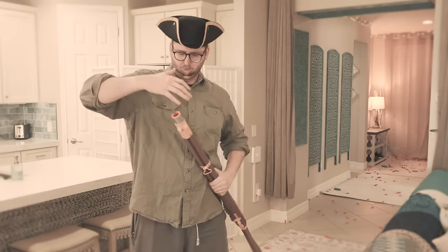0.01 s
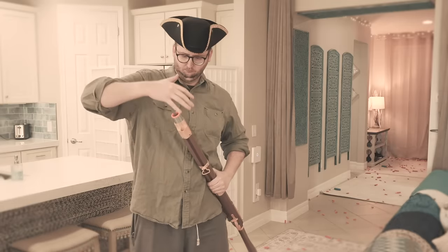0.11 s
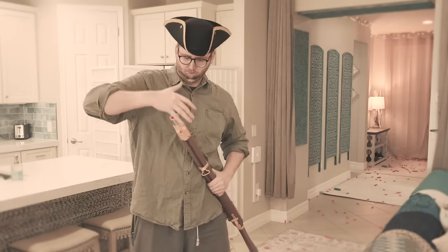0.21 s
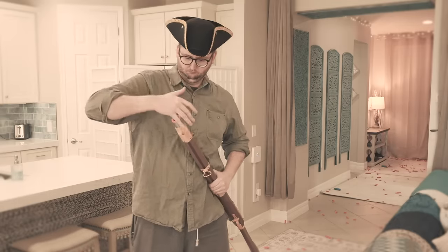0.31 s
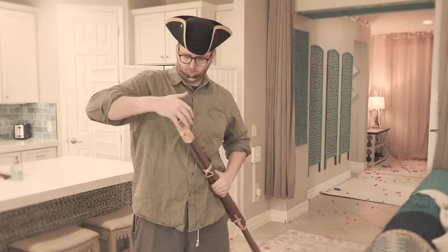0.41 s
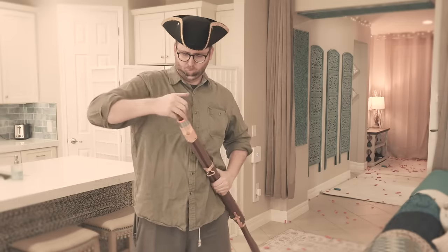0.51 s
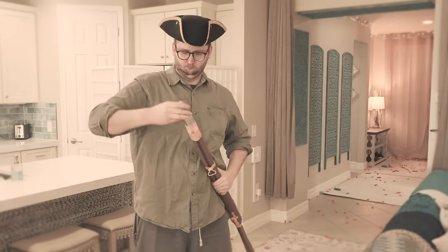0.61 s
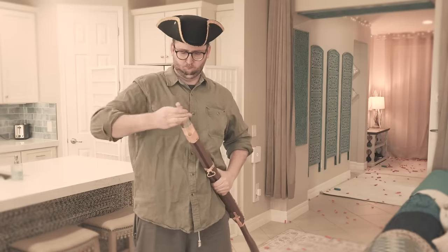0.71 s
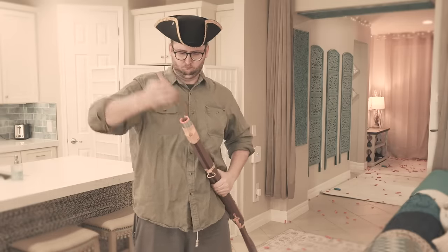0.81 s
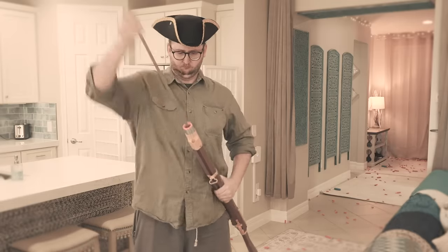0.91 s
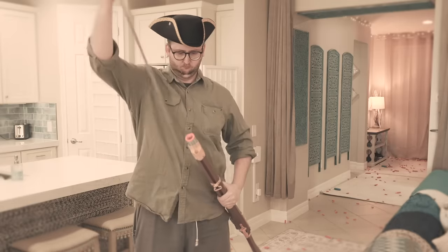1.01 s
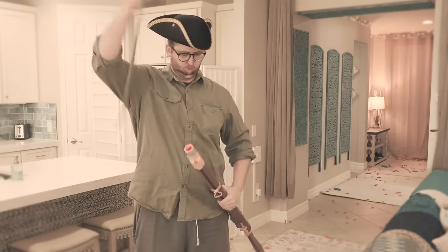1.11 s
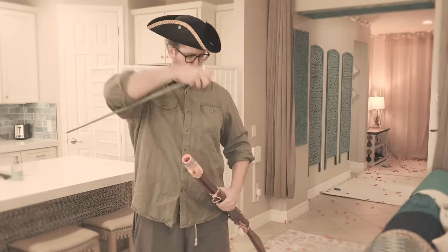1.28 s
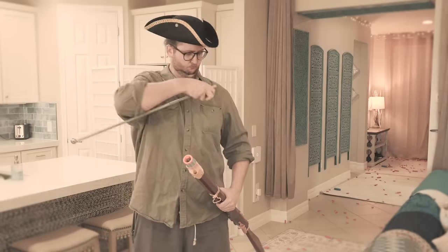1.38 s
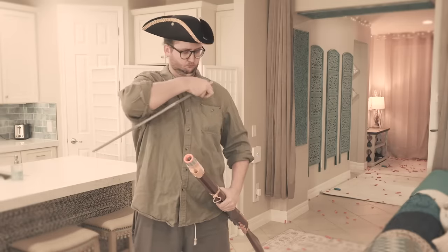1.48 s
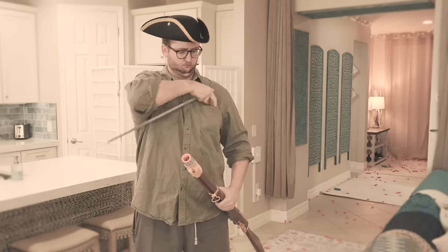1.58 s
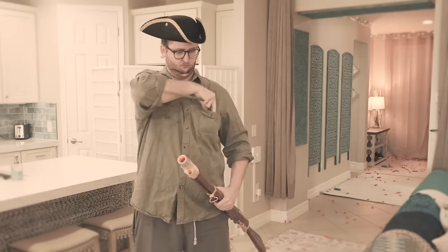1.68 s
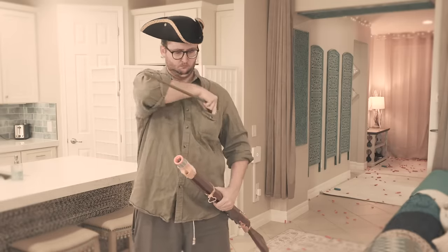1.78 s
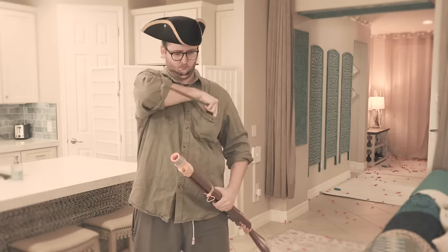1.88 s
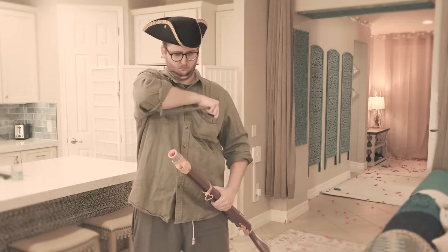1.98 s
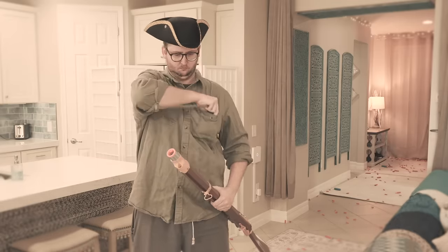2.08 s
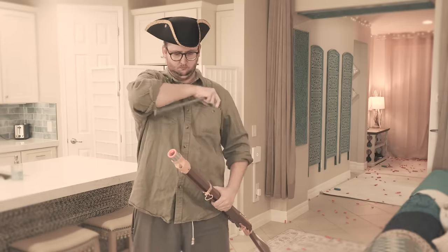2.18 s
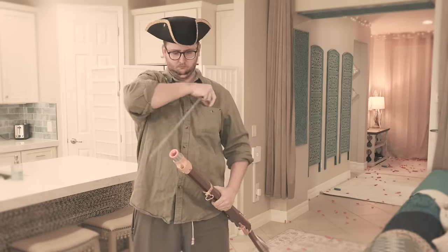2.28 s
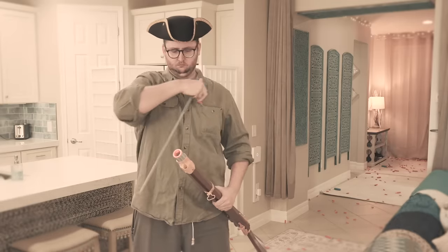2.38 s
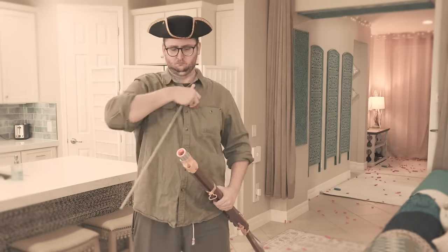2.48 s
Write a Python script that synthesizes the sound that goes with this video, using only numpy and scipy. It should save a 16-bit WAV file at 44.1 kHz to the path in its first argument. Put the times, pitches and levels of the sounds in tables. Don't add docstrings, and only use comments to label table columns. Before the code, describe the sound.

A thin ramrod is drawn from a hollow plastic toy barrel: light scrapes, a hard clack, small ticks, then a bright rattle at the muzzle, followed by faint sleeve rustle in a quiet kitchen, miked about two metres away.

```python
import sys
import numpy as np
from scipy import signal
from scipy.fft import rfft, irfft, next_fast_len
from scipy.io import wavfile
from scipy.ndimage import map_coordinates

SR = 44100
rng = np.random.default_rng(int(sys.argv[2]) if len(sys.argv) > 2 else 0)


def output_pcm(signal):
    pcm = np.clip(np.atleast_2d(signal).T, -1, 1) * 32767
    wavfile.write(sys.argv[1], SR, np.round(pcm).astype(np.int16))


def convert_level_to_amplitude(level_db):
    exponent = np.asarray(level_db, float) / 20
    return 10 ** exponent


N = 110250

LIFT_S, RATTLE_S = .985, .9772


def unit(x):
    return x / np.sqrt(np.mean(x ** 2) + 1e-20)


def along(points, hz):
    f, v = np.transpose(points)
    return np.interp(np.log(hz + 1), np.log(f + 1), v)


def curves(rows):
    s, *cols = np.transpose(rows)
    return [np.interp(np.arange(N) / SR, s, c) for c in cols]


def wobble(rate):
    knot = np.minimum(np.arange(N) * rate / SR, 990)
    return map_coordinates(rng.standard_normal(1000), [knot])


def filtered(x, response):
    m = next_fast_len(N + SR // 2)
    hz = np.fft.rfftfreq(m, 1 / SR)
    return irfft(rfft(x, m) * response(hz), m)[..., :N]


def ringing(x, peaks):
    def shape(f):
        total = 0
        for k, (centre, width, db) in enumerate(peaks):
            damping = 1j * f * width
            mode = damping / (centre * centre - f * f + damping)
            total = total + (-1) ** k * convert_level_to_amplitude(db) * mode
        return total

    norm = np.sqrt(np.mean(abs(shape(np.linspace(0, SR / 2, 4096))) ** 2))
    return filtered(x, shape) / norm


def coloured(spectrum):
    return unit(filtered(rng.standard_normal(N), lambda hz: convert_level_to_amplitude(along(spectrum, hz))))


def grit():
    slips_per_s, spread_db, smooth = 4000, 3, 1.2
    chance, size = rng.random(N), rng.standard_normal((2, N))
    strength = convert_level_to_amplitude(spread_db * np.clip(size[0], -2, 2)) * np.sign(size[1])
    slips = unit((chance < slips_per_s / SR) * strength)
    return unit(slips + smooth * rng.standard_normal(N))


# f/Hz, spectral level/dB
QUIET_SPECTRUM = [(12, -44.5), (20, -7.5), (118, -5), (176, -14), (501, -20.5), (604, -19.5), (1720, -28.5),
                  (3550, -31.5), (12200, -43.5), (15900, -86), (22000, -120)]
# f/Hz, level/dB, swing/dB
HUM_PARTIALS = [(60, 2, 1), (90, -7, 2.5), (120, 0, .8)]
# t/s, level of the lowest hum/dB
HUM_LOAD = [(0.0, -66.5), (0.29, -65), (0.7, -80), (1.04, -68.5), (1.62, -66.5), (2.08, -73.5), (2.5, -73)]


def house():
    t = np.arange(N) / SR
    load_db, = curves(HUM_LOAD)
    bases = [load_db, load_db.mean(), load_db.mean()]
    hum = 0
    for base, (hz, db, swing_db) in zip(bases, HUM_PARTIALS):
        level = convert_level_to_amplitude(base + db + swing_db * wobble(3.8))
        hum = hum + level * np.sin(2 * np.pi * hz * t + 1.8 * wobble(0.89))
    drone_mode = [(349.6, 48, 0)]  # f/Hz, width/Hz, level/dB
    drone_db, drone_s, rise_s = -79, 2.1, 0.065
    drone = unit(ringing(ringing(rng.standard_normal(N), drone_mode), drone_mode))
    drone = convert_level_to_amplitude(drone_db + 1.9 * wobble(14)) * drone / (1 + np.exp((drone_s - t) / rise_s))
    quiet_db = -72
    return hum + drone + convert_level_to_amplitude(quiet_db + .6 * wobble(10)) * coloured(QUIET_SPECTRUM)


# t/s, pressure level/dB, hollow share/dB, bright share/dB
SLIDING = [(0, -78, 15, -42), (.1, -85, 6, -37), (.14, -61.5, 5.5, -26.5), (.18, -63.5, 4, -22),
           (.232, -53, 4.5, -30.5), (.242, -48.5, -0.5, -22.5), (.3, -40, -4, -16), (.33, -74.5, 19.5, -30),
           (.45, -66, 2, -16.5), (.53, -83, 16.5, -35), (.63, -73.5, 18, -31), (.67, -72.5, 11.5, -34),
           (.7, -76, 10, -12.5), (.78, -78.5, 13, -24.5), (.81, -62.5, 7.5, -14), (.84, -62, 0, -11.5),
           (.875, -62.5, 5.5, -17), (.93, -63.5, 10.5, -7), (.975, -50, 3.5, -25)]
# t/s, level/dB, hollow share/dB, bright share/dB, length/s
CHATTERING = [(0.003, -68.5, 5.5, -34, 0.004), (0.038, -82, 7, -29, 0.0033), (0.084, -68, 10, -25, 0.008),
              (0.171, -59, -5.5, 5, 0.0052), (0.185, -57, 5.5, -15, 0.025), (0.204, -55, 6.5, -27, 0.02),
              (0.237, -38.5, -10.5, -8.5, 0.017), (0.254, -46, -10, -35, 0.03),
              (0.297, -54, -0.5, -2, 0.008), (0.321, -43, -3.5, -14, 0.0071),
              (0.329, -37.5, -9.5, -13, 0.016), (0.481, -70, 21, -23.5, 0.013), (0.498, -61, 7, -15, 0.008),
              (0.552, -60.5, -12, -12, 0.0069), (0.567, -51.5, 7, -12.5, 0.017),
              (0.589, -51.5, 4, -14.5, 0.016), (0.608, -64, 14.5, -23, 0.0034),
              (0.617, -62.5, 12.5, -25, 0.006), (0.678, -65, 12, -23, 0.008),
              (0.684, -63, 12.5, -16, 0.008), (0.71, -58, -12, -21, 0.014), (0.72, -60.5, 10, -21.5, 0.006),
              (0.7266, -53.5, 7, -22.5, 0.0083), (0.749, -72, 15, -26, 0.012),
              (0.85, -67, 11.5, -20, 0.015), (0.881, -50.5, -9.5, -11, 0.0075),
              (0.892, -48.5, -9, -8, 0.015), (0.963, -50.5, -7.5, -14, 0.008),
              (0.9715, -57.5, -5.5, 7, 0.002)]


def rubbing():
    t = np.arange(N) / SR
    press_db, hollow_db, bright_db = curves(SLIDING)
    contact = np.clip((LIFT_S - t) / 0.0052, 0, 1)
    slide = convert_level_to_amplitude(press_db + 1.1 * wobble(90)) * contact
    gain = slide * convert_level_to_amplitude([hollow_db, 0 * t, bright_db])
    for s, db, low_db, high_db, length in CHATTERING:
        u = np.clip((t - s) / max(length, .002), 0, 30)
        burst = np.clip(u / 0.05, 0, 1) * np.exp(-1.5 * u ** 2)
        gain = gain + convert_level_to_amplitude(db) * burst * convert_level_to_amplitude([[low_db], [0], [high_db]])
    rattle_db, fade_s, rattle_hollow_db, rattle_bright_db = -27.5, 0.016, -7.5, -3
    after = np.clip(t - RATTLE_S, 0, None)
    rattle = convert_level_to_amplitude(rattle_db) * (after > 0) * np.exp(-after / fade_s)
    gain = gain + rattle * convert_level_to_amplitude([[rattle_hollow_db], [0], [rattle_bright_db]])
    return gain * np.array([grit(), grit(), grit()])


# f/Hz, width/Hz, level/dB
OPEN_TUBE = [(326, 130, -18), (560, 240, -13.5), (868, 170, -7), (1149, 280, -3.5), (1678, 990, -10)]
PLUGGED_TUBE = [(327, 380, -19.5), (563, 140, -10), (1030, 342, -3), (1230, 270, -2), (1650, 240, -6)]
RUBBED_WALL = [(2120, 500, 2), (2910, 540, 7), (3690, 840, 3.5), (4300, 220, 3), (4825, 190, 4),
               (5630, 1400, -6)]
STRUCK_WALL = [(2180, 1300, -9.5), (2760, 380, 1), (3495, 340, -4.5), (4950, 440, -1), (5900, 960, -13.5)]
MUZZLE_RIM = [(1800, 300, -14.5), (2540, 340, 0), (3600, 450, 0), (4740, 696, -2), (5700, 500, 2.5)]
BRIGHT_EDGE = [(6700, 1200, -3), (8000, 1500, 1), (10040, 3800, -0.5), (11573, 810, -0.5),
               (14000, 2500, -8)]


def barrel():
    (low, mid, high), (thud, clack, tick) = rubbing(), blows()
    t = np.arange(N) / SR
    free_s, freeing_s = 0.33, 0.0043
    free = 1 / (1 + np.exp((free_s - t) / freeing_s))
    at_rim = t > RATTLE_S - .001
    hollow_force = low + thud
    hollow = ringing(hollow_force * free, OPEN_TUBE) + ringing(hollow_force * (1 - free), PLUGGED_TUBE)
    wall = ringing(mid * ~at_rim, RUBBED_WALL) + ringing(clack * ~at_rim, STRUCK_WALL)
    wall = wall + ringing((mid + clack) * at_rim, MUZZLE_RIM)

    def dull(f):
        dull_hz = 6950
        return 1 / (1 - (f / dull_hz) ** 2 + 1.2j * f / dull_hz)

    return filtered(filtered(hollow, dull) + wall, dull) + ringing(high + tick, BRIGHT_EDGE)


# f/Hz, width/Hz, level/dB
STOCK_MODES = [(220, 53, -1.5), (370, 120, -1)]


def stock():
    t = np.arange(N) / SR
    press_db = curves(SLIDING)[0]
    held = np.clip((LIFT_S - t) / 0.073, 0, 1)
    after = t - RATTLE_S
    jolt_db, jolt_fade_s = -60, 0.04
    jolt = convert_level_to_amplitude(jolt_db) * (after > 0) * np.exp(-abs(after) / jolt_fade_s)
    stock_db, follows = -69, 0.27
    grumble = held * convert_level_to_amplitude(stock_db + follows * (press_db + 64.5) + 4.4 * wobble(22))
    return (jolt + grumble) * unit(ringing(ringing(grit(), STOCK_MODES), STOCK_MODES))


# f/Hz, decay time by 60 dB/s
ROOM_DECAY = [(200, 0.51), (1000, .36), (3500, 0.35), (5000, 0.35), (10500, 0.24), (15000, 0.3)]


def kitchen(x):
    wet, step = np.zeros(N + SR), SR // 25
    gap_s = 0.00017
    for start in range(0, SR * 5 // 4, step):
        hz, t, z = signal.stft(rng.standard_normal(SR // 2), SR, nperseg=256)
        decay = convert_level_to_amplitude(-60 * t / along(ROOM_DECAY, hz)[:, None])
        tail = signal.istft(z * decay, SR, nperseg=256)[1]
        tail = tail * np.clip(np.arange(len(tail)) / SR / gap_s - 1, 0, 1)
        echo = signal.fftconvolve(x[start:start + step], tail / np.linalg.norm(tail))
        wet[start:start + len(echo)] += echo
    return wet[:N]


# t/s, length/s, level/dB,
# f/Hz
NARROW_TONES = [(0.144, 0.054, -70, 5200), (0.128, 0.0086, -58.5, 2170), (0.236, 0.025, -42, 4900),
                (0.487, 0.007, -57, 2830), (0.573, 0.013, -54, 4920), (0.603, 0.01, -63, 4800),
                (0.658, 0.037, -69, 4670), (.712, 0.01, -68, 4930), (0.835, 0.03, -60.5, 5050),
                (0.89, 0.0092, -44.5, 5120), (0.192, 0.0099, -53, 1900), (0.221, 0.014, -52.5, 1800),
                (0.263, 0.044, -46.5, 1620), (0.879, 0.0046, -50.5, 6160), (.984, 0.019, -50.5, 13460),
                (0.975, 0.01, -45, 10230), (0.926, 0.017, -61.5, 5170), (0.939, .02, -58.5, 2920),
                (0.958, 0.0096, -44, 2950)]


def singing():
    t = np.arange(N) / SR
    width_hz, edge_s = 350, 0.0033
    out = np.zeros(N)
    for s, length, db, hz in NARROW_TONES:
        onset = np.clip((t - s) / edge_s, 0, 1)
        release = np.exp(-np.clip(t - s - length, 0, 1) / edge_s)
        tone = unit(ringing(rng.standard_normal(N), [(hz, width_hz, 0)]))
        out += convert_level_to_amplitude(db) * onset * release * tone
    return out


# t/s, peak level/dB, hollow share/dB, bright share/dB
BORE_KNOCKS = [(0.131, -45.5, -14.5, -26.5), (0.1709, -36.5, -12, -12), (0.2381, -25.5, -20.5, -12),
               (0.2409, -21, -16, -9.5), (0.2434, -23, -14.5, -13), (0.2472, -22, -16.5, -15.5),
               (0.3152, -14.5, -13.5, -14.5), (0.3158, -5.5, -16, -11.5), (0.3197, -12, -16, -19),
               (0.5705, -32, -2, -12), (0.5885, -35, -8.5, -7.5), (0.725, -38.5, -0.5, -24.5),
               (0.798, -49, -15.5, -8.5), (0.8605, -38, -17, -13), (0.8788, -31.5, -14.5, -12)]
# t/s, peak level/dB, hollow share/dB, bright share/dB
MUZZLE_TRIPS = [
    (.9767, -24, -18, 6),
    (.9791, -15, -12, -1),
    (.9817, -15, -10, -7),
    (.9842, -18, -10, -7),
    (.9870, -21, -12, -6),
    (.9935, -25, -14, -6),
    (.9995, -24, -14, -6),
    (1.0035, -23, -14, -8),
]


def blows():
    lead_s, lead_share = .0007, 0.17
    force = np.zeros((3, N))
    for s, db, low_db, high_db in list(BORE_KNOCKS) + list(MUZZLE_TRIPS):
        size = convert_level_to_amplitude(db + 6) * convert_level_to_amplitude([low_db, 0, high_db])
        force[:, round(s * SR) + 30] += size
        force[:, round((s - lead_s) * SR) + 30] -= lead_share * size
    return force


# f/Hz, level/dB, decay time by 60 dB/s
ROD_MODES = [(2950, -2, .06), (3340, -3, .06), (4920, -5, .05), (5660, 0, .035), (10400, -7, .04),
             (13600, -5, .045)]


def rod():
    rod_s, rod_db, unsteady_db = .9793, -35, 4
    t = np.clip(np.arange(N) / SR - rod_s, 0, None)
    ring = 0
    for hz, db, t60 in ROD_MODES:
        level = convert_level_to_amplitude(db - 60 * t / t60 + unsteady_db * wobble(200))
        ring = ring + level * np.sin(2 * np.pi * hz * t)
    return convert_level_to_amplitude(rod_db) * ring * (1 - np.exp(-t / 0.0011))


# t/s, level/dB, half length/s
SLEEVE_BRUSHES = [(1.3, -84.5, 0.048), (1.48, -82.5, 0.028), (1.647, -85, 0.039), (1.766, -72, 0.041),
                  (1.866, -74.5, 0.042), (1.968, -79, 0.028), (2.012, -75, 0.041), (2.157, -76.5, 0.027),
                  (2.2, -81, 0.023), (2.257, -93, 0.053), (2.461, -84.5, 0.053)]
# t/s, level/dB
CREASE_SNAPS = [
    (1.3005, -73),
    (1.4648, -70),
    (1.568, -72),
    (1.6509, -63),
]
# f/Hz, spectral level/dB
CLOTH_SPECTRUM = [(290, -40), (500, -7), (678, -5), (1770, -8), (5390, -9), (6700, -15), (13600, -14.5),
                  (16000, -45)]
# f/Hz, width/Hz, lift (ratio)
WEAVE_LIFTS = [(1288, 205, 0.98), (3488, 500, 0.66), (5200, 525, 0.72)]


def sleeve():
    t = np.arange(N) / SR
    rub = sum(convert_level_to_amplitude(db) * np.exp(-((t - s) / half) ** 2) for s, db, half in SLEEVE_BRUSHES)
    rub = rub * convert_level_to_amplitude(1.9 * wobble(60))
    snaps = sum(convert_level_to_amplitude(db - 4) * (t > s) * np.exp(-abs(t - s) / .002) for s, db in CREASE_SNAPS)

    def cloth(hz):
        weave = 1 + sum(lift * np.exp(-((hz - c) / w) ** 2) for c, w, lift in WEAVE_LIFTS)
        return convert_level_to_amplitude(along(CLOTH_SPECTRUM, hz)) * weave

    return (rub + snaps) * unit(filtered(grit(), cloth))


# f/Hz, level/dB
TOWARD_WALLS = [(1000, 1), (2600, 0), (3800, 0), (4300, 3), (5000, -6), (5800, 0), (10000, 0)]


def scene():
    near = barrel() + rod() + singing()
    aside = filtered(near, lambda hz: convert_level_to_amplitude(along(TOWARD_WALLS, hz)))
    room_db = -6
    return (near + convert_level_to_amplitude(room_db) * kitchen(aside) + sleeve() + house() + stock())[None]


def band_limit(x):
    return signal.sosfilt(signal.butter(12, 16450, fs=SR, output="sos"), x)


def record(dry):
    top_hz, fade_hz = 16400, 14600
    mix = filtered(dry, lambda hz: (hz < top_hz) / (1 + (hz / fade_hz) ** 16))
    return band_limit(mix)


dry = scene()
out = record(dry)
output_pcm(out)
```